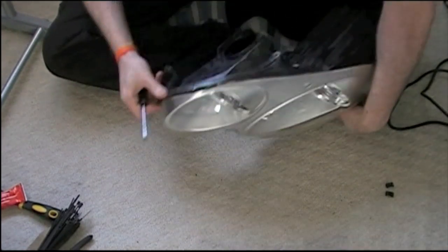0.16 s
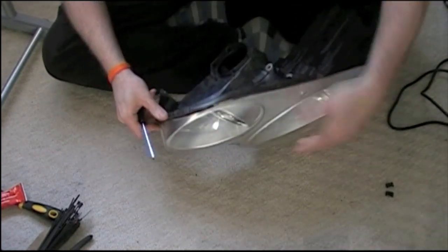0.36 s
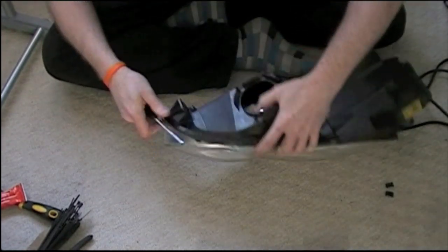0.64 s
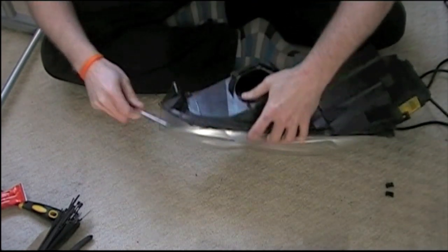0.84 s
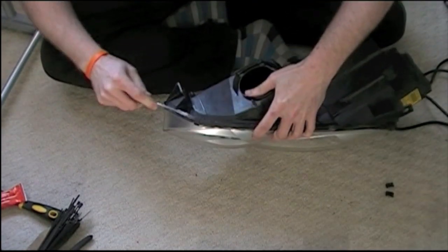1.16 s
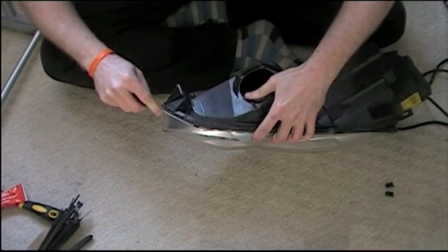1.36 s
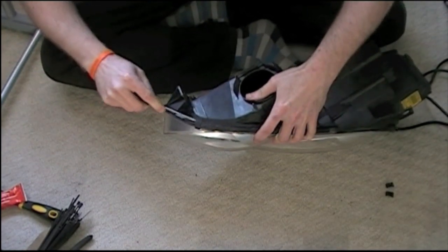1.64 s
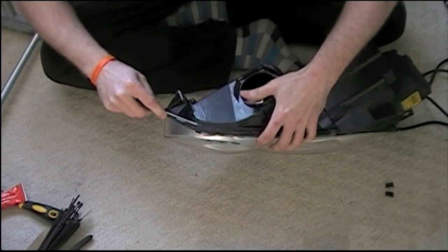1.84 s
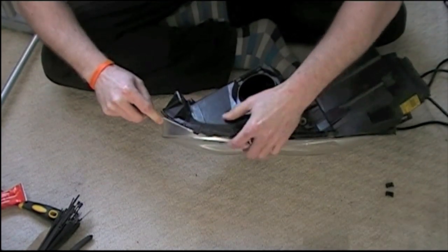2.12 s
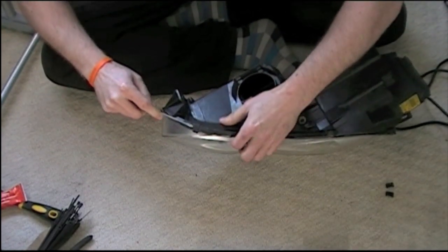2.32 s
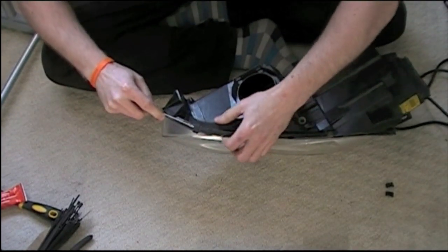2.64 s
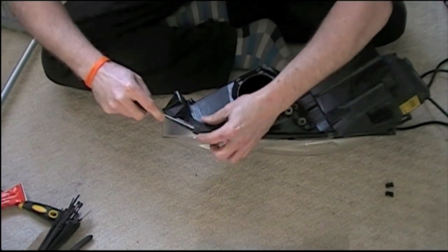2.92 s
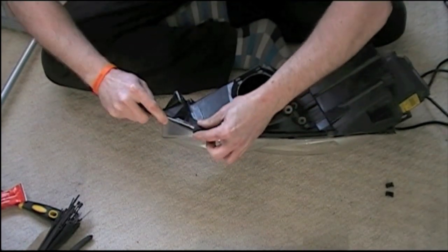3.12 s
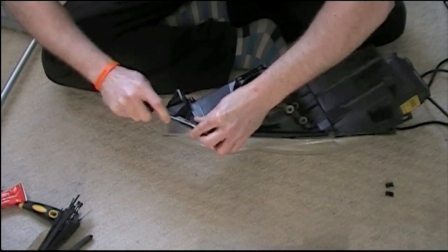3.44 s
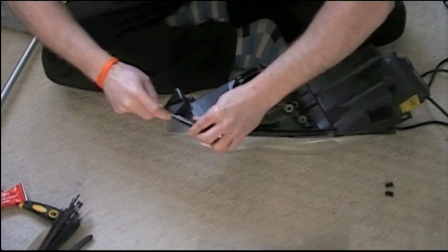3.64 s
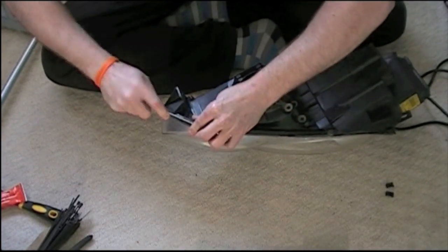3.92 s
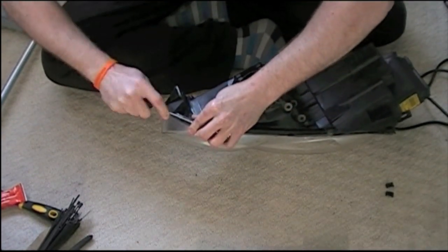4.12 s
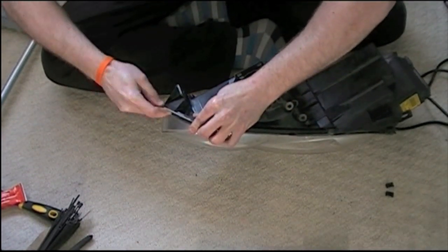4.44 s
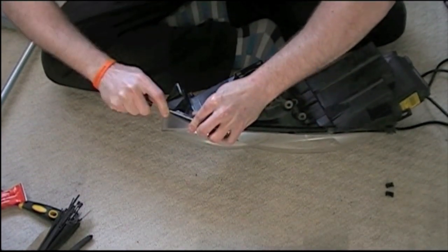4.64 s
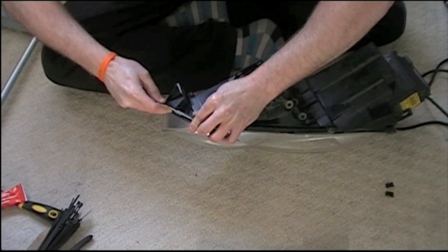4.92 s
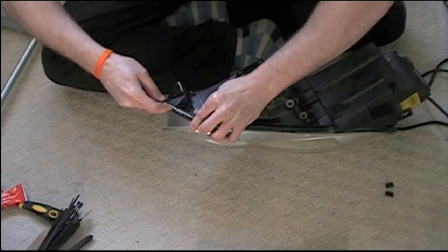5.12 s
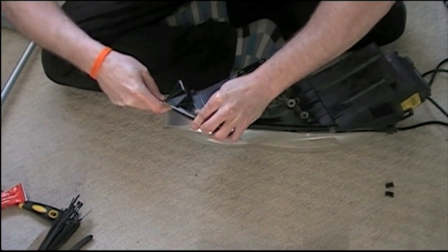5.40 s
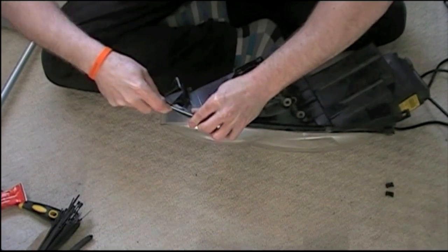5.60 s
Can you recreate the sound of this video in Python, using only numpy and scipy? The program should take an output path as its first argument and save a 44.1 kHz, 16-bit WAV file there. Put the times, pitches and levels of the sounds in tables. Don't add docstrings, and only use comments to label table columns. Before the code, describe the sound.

A small, quiet, carpeted room heard through a camera's stereo microphone, with constant soft hiss, faint mains hum and weak motor tones. From 0 s, hands slide and turn a hollow plastic lamp housing; at about 0.5 s it lands with a loud, boxy double thump and a scuff. Smaller knocks and carpet rubs follow. A thin steel blade gives a bright click at 1.2 s, duller rattly ones near 1.65 s, a quick cluster around 1.85-1.95 s, and others at 2.3 and 2.55 s, mixed with finger hiss. Soft thumps and a short scrape come at about 3.0 s. From 3.3 to 5.3 s it is sparse: tiny scrapes, weak taps and barely audible camera ticks. At 5.4 s a clip snaps off, an extremely loud, sharp, clipped crack with treble first, then a brief plastic rattle and short room echo. Light scuffing and small clicks follow at 5.6 s, then mostly hiss.

```python
import sys
import numpy as np
from scipy import signal
from scipy.fft import rfft, irfft
from scipy.io import wavfile
from scipy.ndimage import uniform_filter1d

SR = 44100
rng = np.random.default_rng(int(sys.argv[2]) if len(sys.argv) > 2 else 0)


def output_pcm(signal):
    pcm = np.clip(np.atleast_2d(signal).T, -1, 1) * 32767
    wavfile.write(sys.argv[1], SR, np.round(pcm).astype(np.int16))


def magnitude_from_level(level_db):
    exponent = np.asarray(level_db, float) / 20
    return 10 ** exponent


N = 254324

# f/Hz, level/dB, t60/s
SHELL_MODES = [(616, -26, 0.069), (794, 0.5, 0.075), (888.6, 7, 0.076), (1103.5, 13.5, 0.047),
               (1320, 7.5, 0.015), (1755, 2.5, 0.19), (1840, -6.5, 0.025), (1890, -8, 0.03),
               (2530, -34, 0.017)]
# f/Hz, level/dB, t60/s
CAVITY_MODES = [(174.8, -1.5, 0.085), (206.2, 10, 0.12), (237.2, 10.5, 0.18), (275, -4, 0.36)]
# f/Hz, level/dB, t60/s
WALL_MODES = [(312.3, 7.5, 0.037), (377, -6, 0.2), (465, 5, 0.054), (565, 4, 0.079), (695, -7, 0.077)]


def level(x, db):
    return x * magnitude_from_level(db) / np.sqrt(np.mean(x ** 2))


def peak(x, db):
    return x * magnitude_from_level(db) / np.abs(x).max()


def along(table, hz):
    f, v = np.transpose(table)
    return np.interp(np.log(np.maximum(hz, 1)), np.log(f), v)


def curve(table):
    return np.interp(np.arange(N) / SR, *np.transpose(table))


def coloured(x, table):
    hz = np.arange(len(x) // 2 + 1) * SR / len(x)
    return irfft(rfft(x) * magnitude_from_level(along(table, hz)), len(x))


def band(x, lo_hz, hi_hz):
    return signal.sosfilt(signal.butter(2, [lo_hz, min(hi_hz, .45 * SR)], "band", fs=SR, output="sos"), x)


def steep(x, lo_hz, hi_hz):
    return band(band(x, lo_hz, hi_hz), lo_hz, hi_hz)


def add(out, s, sound):
    i = int(s * SR)
    out[..., i:i + sound.shape[-1]] += sound[..., :N - i]


def walk(rate_hz):
    hold = int(SR / rate_hz)
    steps = np.repeat(rng.standard_normal(N // hold + 1), hold)
    return 1.1 * uniform_filter1d(uniform_filter1d(steps, hold), hold)[:N]


def grit(shape, spread_db):
    return rng.standard_normal(shape) * magnitude_from_level(spread_db * np.minimum(rng.exponential(size=shape), 4))


def contact(ms, noise):
    t = np.arange(len(noise)) / SR * 1000 / max(ms, .1)
    return noise * np.exp(-t) * np.minimum(t * 8 + 0.099, 1)


def hard_contact(ms, noise):
    force = contact(ms, noise)
    fade = np.exp(-np.arange(len(noise)) / SR * 1000 / (4 * ms)) * np.linspace(1, 0, len(noise))
    for _ in range(2):
        spectrum = rfft(force)
        force = fade * irfft(spectrum / (np.abs(spectrum) + 1e-9), len(noise))
    return force


def ring(modes, force, chance, scatter_db=6.0, detune=.04):
    strength, shift = chance[:, :len(modes), :, None]
    hz, db, t60_s = np.array(modes).T[:, :, None, None]
    t = np.arange(len(force)) / SR
    decay = magnitude_from_level(db + scatter_db * strength - 60 * t / t60_s)
    tones = decay * np.sin(2 * np.pi * hz * (1 + detune * shift) * t)
    return peak(signal.fftconvolve(tones.sum((0, 1)), force)[:len(force)], 0)


def resonate(x, modes):
    return sum(magnitude_from_level(db) * band(x, hz - 3 / t60_s, hz + 3 / t60_s) for hz, db, t60_s in modes)


def background():
    # f/Hz, level/dB per Hz
    hiss_mid = [(15, -45.5), (25, -14), (70, -6), (117, -2), (166, -4), (416, -9), (476, -10), (818, -14.5),
                (1070, -9.5), (1330, -16), (10100, -35.5), (13200, -33), (16000, -46.5)]
    # f/Hz, level/dB per Hz
    hiss_side = [(15, -45.5), (25, -9), (127, 1), (427, 0), (463, -12), (516, -1.5), (887, -7.5),
                 (1040, -9), (2350, -17.5), (8360, -33), (12500, -39), (16000, -42)]
    # f/Hz, rms/dB
    hum_tones = [(118.4, -67), (721.4, -81.5), (1082, -75.5)]
    mid = level(coloured(rng.standard_normal(N), hiss_mid), -65)
    side = level(coloured(rng.standard_normal(N), hiss_side), -56)
    t = np.arange(N) / SR
    for hz, db in hum_tones:
        flutter_db = 3 * hz / 1000 * walk(30)
        tone = np.sin(2 * np.pi * hz * t + .3 * walk(8))
        mid = mid + np.sqrt(2) * magnitude_from_level(db + flutter_db) * tone
    return np.array([mid + side, mid - side])


def rubbing():
    # t/s, pressure/dB
    finger_pressure = [(0.0, -59), (0.14, -65.5), (0.35, -54), (0.5, -50.5), (0.66, -59.5), (0.8, -59.5),
                       (1.0, -67), (1.24, -62), (1.5, -68), (1.8, -70), (2.0, -60.5), (2.34, -74.5),
                       (2.65, -60), (2.82, -66.5), (2.92, -56.5), (3.08, -68), (3.94, -79.5), (5.77, -79)]
    # t/s, pressure/dB
    carpet_pressure = [(0.0, -59), (0.2, -61), (0.5, -51.5), (0.68, -58.5), (0.91, -51.5), (1.02, -63.5),
                       (1.6, -66.5), (1.87, -57), (2.12, -61.5), (2.34, -67.5), (2.51, -62), (2.8, -69),
                       (2.95, -60.5), (3.31, -65.5), (4.0, -71.5), (5.43, -73.5), (5.58, -56.5),
                       (5.77, -65.5)]
    # f/Hz, level/dB per Hz
    rub_hiss = [(2650, -48), (4500, -35.5), (6190, -4.5), (9460, -10.5), (14500, -26), (15600, -47),
                (16000, -68.5)]
    fingers_db, carpet_db = curve(finger_pressure), curve(carpet_pressure)
    slips = grit((4, N), 2.5)
    hiss = level(coloured(slips[0], rub_hiss), -2.3) * magnitude_from_level(fingers_db + 3.8 * walk(34))
    grind = level(steep(slips[1], 2400, 6500), -3.5) * magnitude_from_level(fingers_db + 1.5 * walk(28))
    shell = level(resonate(slips[2], SHELL_MODES), -4.5)
    scrub = level(band(slips[1][::-1], 400, 2800), 0)
    scuff = level(shell + scrub, -0.45) * magnitude_from_level(carpet_db + 1.9 * walk(33))
    hollow = level(resonate(slips[3], CAVITY_MODES + WALL_MODES), -0.5)
    rumble = hollow * magnitude_from_level(carpet_db + 2.2 * walk(11.0))
    return hiss + grind + scuff + rumble


def room(x, table, wet_db):
    # f/Hz, t60/s
    room_t60 = [(150, 0.37), (500, 0.2), (2000, 0.19), (5000, 0.18), (9000, 0.19), (14000, .14)]
    # f/Hz, level/dB
    room_colour = [(150, -5), (500, 6.5), (2000, -1), (5000, 2), (9000, -2), (14000, -24)]
    t = np.arange(SR // 2) / SR
    tail = 0
    for hz in 140 * 2 ** np.arange(0, 7, .5):
        fade = magnitude_from_level(along(room_colour, hz) + along(table, hz) - 60 * t / along(room_t60, hz))
        tail = tail + fade * band(rng.standard_normal(len(t)), hz / 2 ** .25, hz * 2 ** .25)
    spectrum = rfft(tail)
    power = np.abs(spectrum) ** 2
    even = np.sqrt(uniform_filter1d(power, size=300) / uniform_filter1d(power, size=30))
    tail = irfft(spectrum * even, len(t))
    build = np.clip((t - .001) / 0.0021, 0, 1) * np.clip((t[-1] - t) * 5, 0, 1) ** 2
    return magnitude_from_level(wet_db) * signal.fftconvolve(x, tail * build)[:N]


def scrapes():
    # start t/s, hiss/dB, grind/dB re hiss, shell/dB re hiss, rise/ms
    slides = [(0.0559, -42.5, -7, -8, 26), (0.1152, -58, -5, 16.5, 5.7), (0.4768, -40, -20, -4, 3.3),
              (0.5207, -42, -5.5, 0.5, 17.6), (0.8936, -48, -9, 9, 13), (0.9188, -49.5, -3, 13.5, 6.8),
              (1.8238, -46.5, -15, -4, 4.4), (2.1058, -50, -23, -1, 11.6), (2.2104, -57.5, -13, -3, 25),
              (2.4024, -54, -0.5, 0, 8.1), (2.998, -44.5, -9, 1.5, 5.3), (2.6974, -54, -31.5, -1, 22),
              (2.8878, -49.5, -18, -4.5, 17), (3.2603, -59.5, -26, 4.5, 25), (3.3596, -60, -27, -0.5, 18),
              (3.5039, -59.5, -9, 8.5, 7.1), (3.7529, -57, -18, 1.5, 6.8), (3.8781, -56.5, 7, 9, 14.5),
              (4.489, -54.5, 3.5, 4, 11), (4.8551, -66.5, 5, 8.5, 13.5), (4.8965, -58, 2, 3.5, 4.4),
              (5.5932, -49, -13, -3, 8.3), (5.6144, -46.5, -4, -3, 8.3), (5.6366, -54.5, -23, 14.5, 4.9)]
    out = np.zeros(N)
    for (s, db, grind_db, shell_db, rise_ms), g in zip(slides, grit((len(slides), 3, 8192), 2.5)):
        t = np.arange(g.shape[1]) / SR * 1000 / max(rise_ms, 1)
        hiss = level(steep(g[0], 5000, 10000), 0)
        grind = level(steep(g[1], 2300, 4700), grind_db)
        shell = level(band(g[2], 540, 2300), shell_db)
        swell = t * np.exp(1 - t)
        add(out, s, magnitude_from_level(db - 6.0) * swell * (hiss + grind + shell))
    return out


def thumps():
    # t/s, peak/dB, upper body/dB re peak, contact/ms
    knocks = [(0.123, -24.5, -1.5, 3.7), (0.479, -5.5, 2, 1.2), (0.488, -17, -5, 0.97),
              (0.511, -3.5, 2, 4.1), (0.534, -35, -26, 2.8), (0.563, -35, 3, 1.2), (0.748, -28, 9.5, 11),
              (0.921, -28.5, 3, 13), (1.062, -55.5, 22, 2.7), (1.231, -30, -15, 0.64), (1.331, -32, 2, 1.3),
              (1.656, -24, 8, 9.6), (1.833, -27.5, 1, 9.3), (1.917, -39.5, 20.5, 8.9),
              (2.099, -30.5, 1.5, 3.1), (2.294, -32, -26, 0.75), (2.476, -29, 5.5, 6.3),
              (2.563, -31, 5.5, 9.5), (2.919, -38, -12, 6), (3.01, -26.5, 2, 5.6),
              (3.049, -23.5, -17, 10.6), (3.402, -32.5, -12, 1.6), (3.518, -33.5, -2.5, 3.2),
              (3.758, -41.5, -1.5, 13), (3.898, -46, 10.5, 2.8), (4.382, -40.5, -3, 3.2),
              (4.501, -42.5, 8.5, 5.7), (5.39, -31, 19, 1.5)]
    out = np.zeros(N)
    noise = rng.standard_normal((len(knocks), 6144))
    chance = rng.standard_normal((len(knocks), 2, 5, 2))
    for (s, db, wall_db, ms), n, c in zip(knocks, noise, chance):
        force = steep(contact(ms, 1 + 2.68 * n), 161, 840)
        cavity = ring(CAVITY_MODES, force, c, 1.2, .012)
        walls = magnitude_from_level(wall_db) * ring(WALL_MODES, force, c[::-1], 2., .03)
        shell = peak(steep(contact(2 * ms + 4, n[::-1]), 600, 1600), wall_db - 17)
        add(out, s - .001, magnitude_from_level(db - 12) * (cavity + walls + shell))
    return out


def clicks():
    # t/s, peak/dB, crack f/Hz, shell/dB re peak, edge/dB re peak
    slips = [(0.4768, -50, 3080, 11.5, -12), (0.7497, -37, 3020, 9, -6), (1.113, -57, 5950, -6.5, -14),
             (1.138, -66, 6500, -8, -10), (1.2257, -20, 4800, -9.5, -11), (1.3394, -38.5, 4600, -3, -8),
             (1.6293, -47, 2950, 11.5, -17), (1.6537, -31.5, 3950, 8.5, -10),
             (1.8642, -37.5, 5200, -7.5, -1), (1.8932, -30, 4600, -1.5, -6.5),
             (1.9173, -23.5, 4760, -3.5, -6), (2.2954, -29.5, 3280, -3, -7), (2.409, -53, 4900, -9, -20),
             (2.4693, -63, 2550, 11, -9), (2.5609, -36, 4920, -5, -5.5), (3.0054, -44.5, 3950, -1, -11),
             (3.687, -60, 5770, 2, 7), (3.6953, -54, 6400, -7, 3), (3.7526, -64, 6100, -13, 4),
             (3.899, -48.5, 3040, 0, -17), (4.496, -49, 5000, -9, -38), (5.232, -64, 3480, -13.5, -23),
             (5.5934, -48, 6060, -19, -7), (5.6206, -42.5, 2860, -2, -15)]
    # f/Hz, level/dB, t60/s
    blade_modes = [(2860, -9, 0.0047), (3730, 11.5, 0.051), (4340, -20.5, 0.0059), (4926, 23, 0.036),
                   (5390, 17, 0.015), (6440, 5, 0.017)]
    steel_ms, rattle_ms = 2.57, 12.4
    out = np.zeros(N)
    noise = rng.standard_normal((len(slips), 3072))
    chance = rng.standard_normal((len(slips), 2, 9, 4))
    for (s, db, hz, shell_db, edge_db), n, c in zip(slips, noise, chance):
        force = hard_contact(steel_ms, n)
        edge = peak(steep(force, 6820, 10470), edge_db)
        crack = peak(steep(force, hz / 1.105, hz * 1.15), -8.5) + peak(steep(force, 2200, 6450), -3)
        steel = magnitude_from_level(-7.5) * ring(blade_modes, force, c, 3., 0.033)
        rattle = hard_contact(rattle_ms, n[::-1])
        distinct = .6 * ring(SHELL_MODES, rattle, c[::-1], 1.2, .08)
        dense = peak(steep(rattle, 480, 2800), -3)
        shell = magnitude_from_level(shell_db) * (distinct + dense)
        add(out, s - .0004, magnitude_from_level(db + 7.0) * (edge + crack + steel + shell))
    return out


def ticks():
    # t/s, peak/dB
    motor_ticks = [(3.3303, -59), (3.4111, -61), (3.613, -58.5), (3.8511, -60), (4.051, -60), (4.3311, -60),
                   (4.6114, -60), (4.6508, -61), (4.7303, -59), (4.9307, -61), (5.0115, -61), (5.1312, -60),
                   (5.2108, -62), (5.3308, -59.5)]
    ping_hz, rise_ms = 2324, 1.6
    out = np.zeros(N)
    t = np.arange(1024) / SR
    rise = t * 1000 / rise_ms
    ping = rise * np.exp(1 - rise) * np.sin(2 * np.pi * ping_hz * t)
    for s, db in motor_ticks:
        add(out, s - .002, magnitude_from_level(db - 1) * ping)
    return out


def snap():
    # f/Hz, level/dB per Hz
    snap_colour = [(120, -35.5), (200, -2.5), (448, -7), (623, -9), (933, -4.5), (1180, -12), (1650, -9),
                   (7410, -11.5), (16000, -33.5)]
    snap_s, snap_db = 5.3908, 2.5
    rattle_ms, rattle_db = 24, -23.5
    bend_lag_ms, bend_hz = .9, 2323
    out = np.zeros(N)
    noise = rng.standard_normal((3, 8192))
    burst = peak(hard_contact(1.76, noise[0]), 0) + peak(hard_contact(9.5, noise[1]), -13.5)
    spectrum = rfft(burst + peak(contact(rattle_ms, noise[2]), rattle_db))
    hz = np.arange(len(spectrum)) * SR / len(burst)
    delay_s = bend_lag_ms / 1000 / (1 + (hz / bend_hz) ** 4)
    lag = np.cumsum(delay_s) * 2 * np.pi * hz[1]
    even = np.sqrt(uniform_filter1d(np.abs(spectrum) ** 2, size=40))
    force = irfft(spectrum / even * np.exp(-1j * lag), len(burst))
    fade = np.linspace(1, 0, len(force)) ** 2
    add(out, snap_s, peak(coloured(force, snap_colour) * fade, snap_db))
    return out


def scene():
    # f/Hz, side minus mid/dB
    room_side = [(150, -9), (500, -12), (2000, -5.5), (5000, -19), (8000, 5), (14000, 2.5)]
    knocks = thumps()
    dry = clicks() + snap() + knocks + scrapes() + rubbing()
    mid = dry + room(dry, [(1, 0), (2, 0.034)], -33.5)
    side = room(dry, room_side, -34.5) - magnitude_from_level(-12.5) * knocks + magnitude_from_level(-17.5) * band(dry, 4210, 12000)
    bass_cut = signal.butter(6, 165, "high", fs=SR, output="sos")
    top_cut = signal.butter(2, 15500, fs=SR, output="sos")
    stereo = signal.sosfilt(np.vstack([bass_cut, top_cut]), np.array([mid + side, mid - side]))
    return stereo + background() + ticks()


def band_limit(x):
    return signal.sosfilt(signal.butter(12, 16510, fs=SR, output="sos"), x)


def record(dry):
    mix = np.clip(dry, -1, 1)
    return band_limit(mix)


dry = scene()
out = record(dry)
output_pcm(out)
```